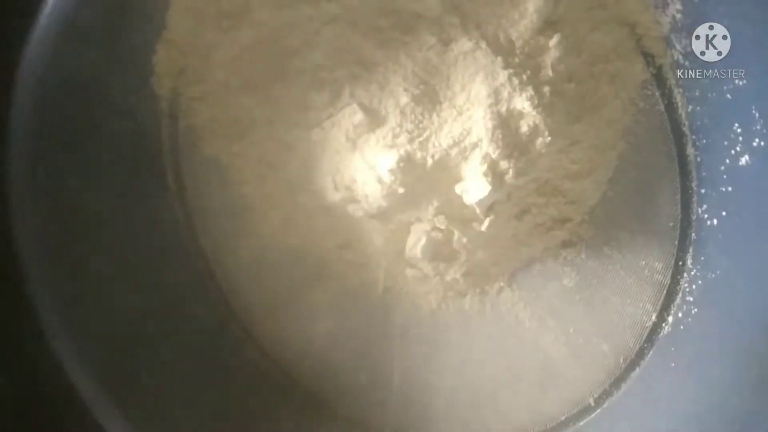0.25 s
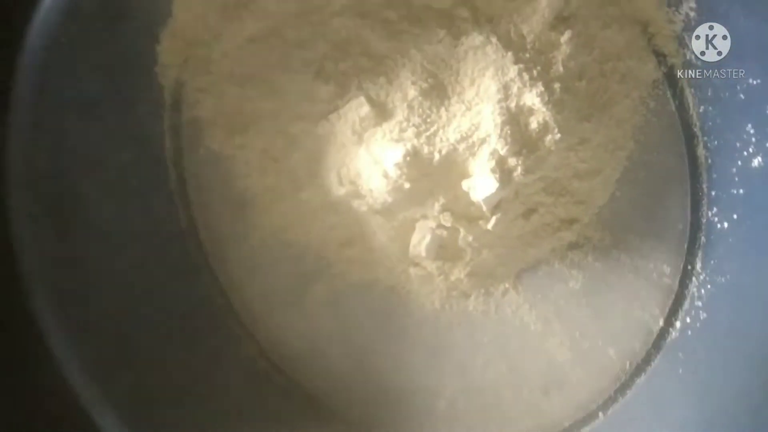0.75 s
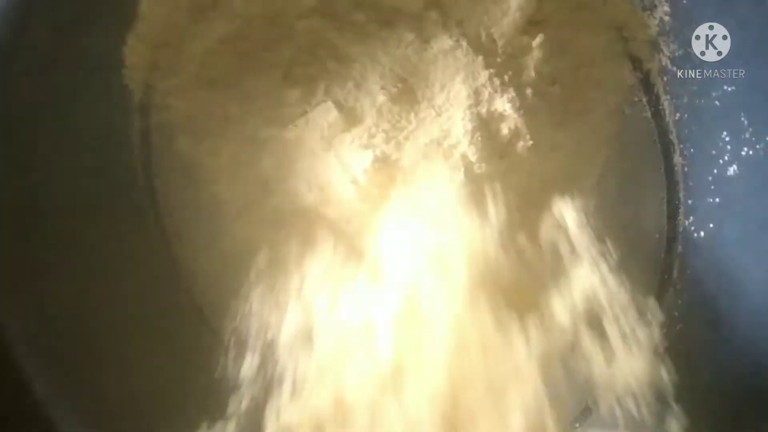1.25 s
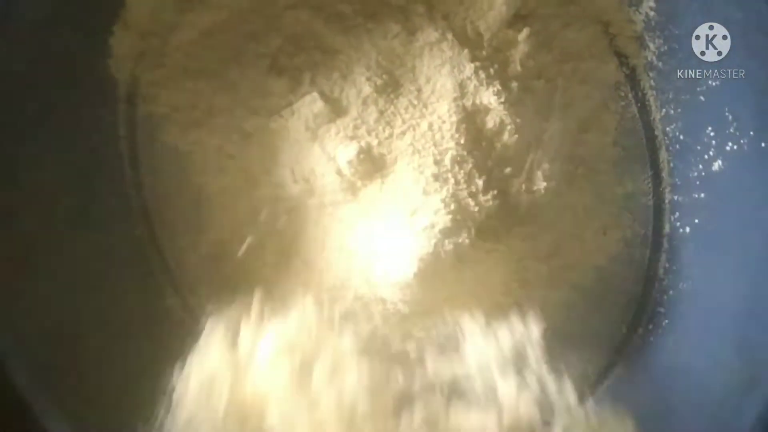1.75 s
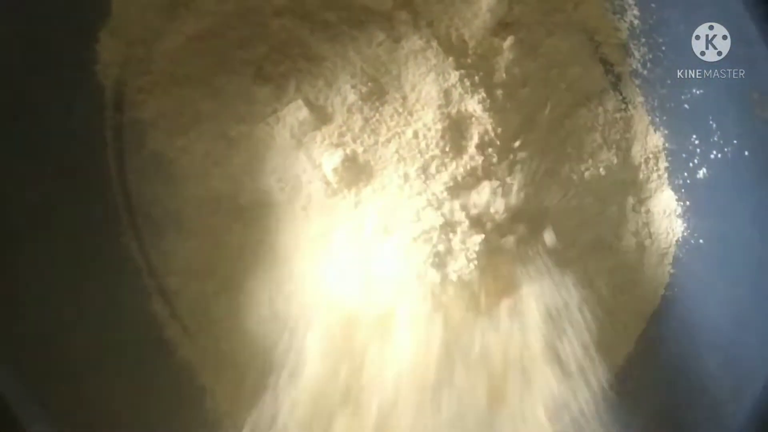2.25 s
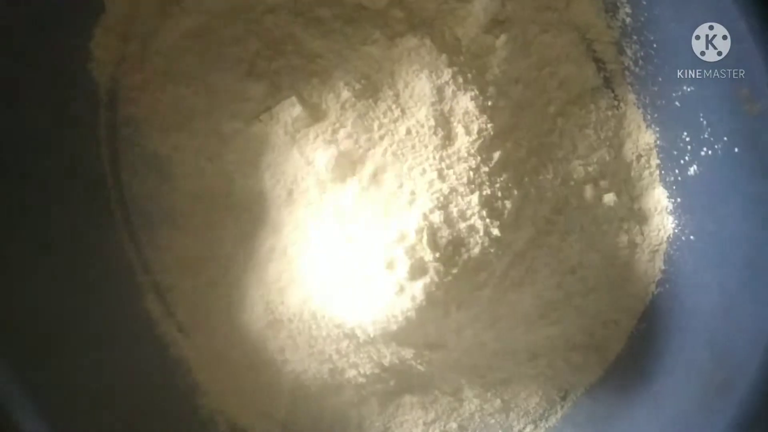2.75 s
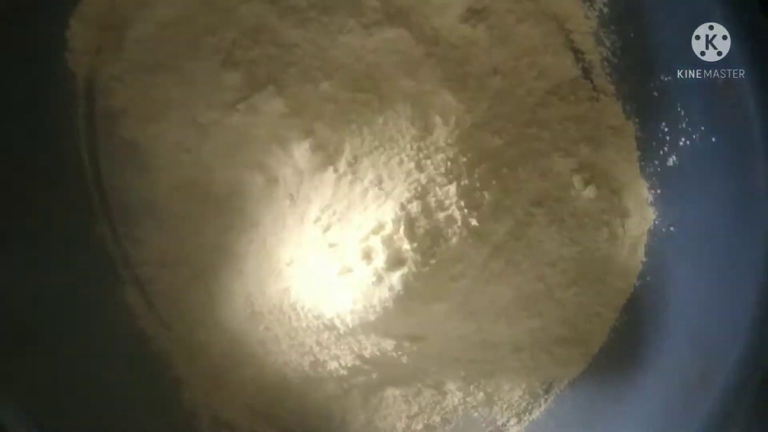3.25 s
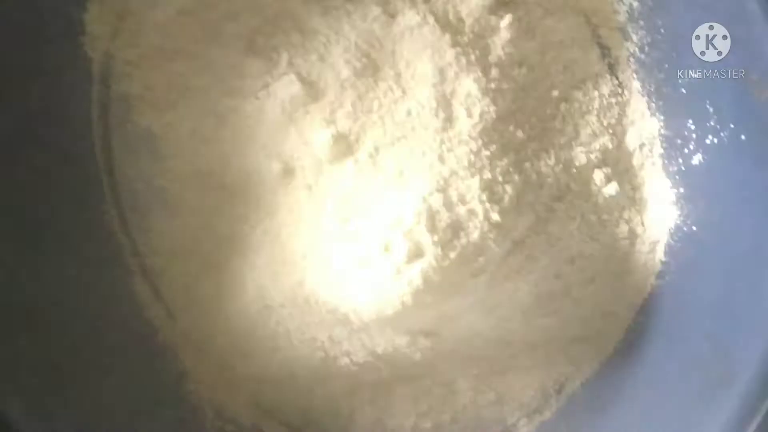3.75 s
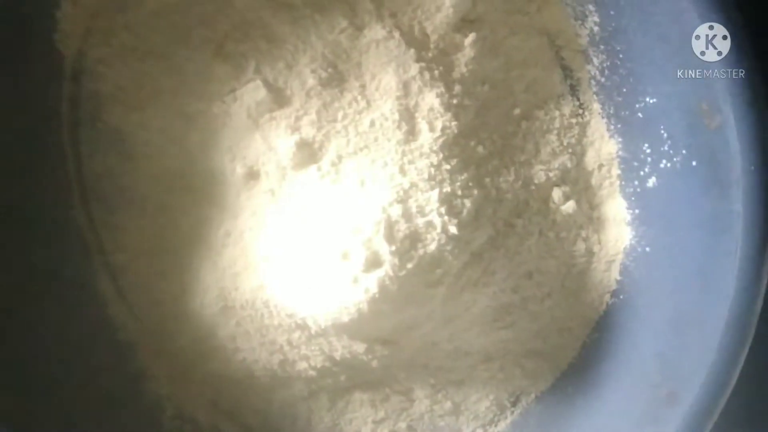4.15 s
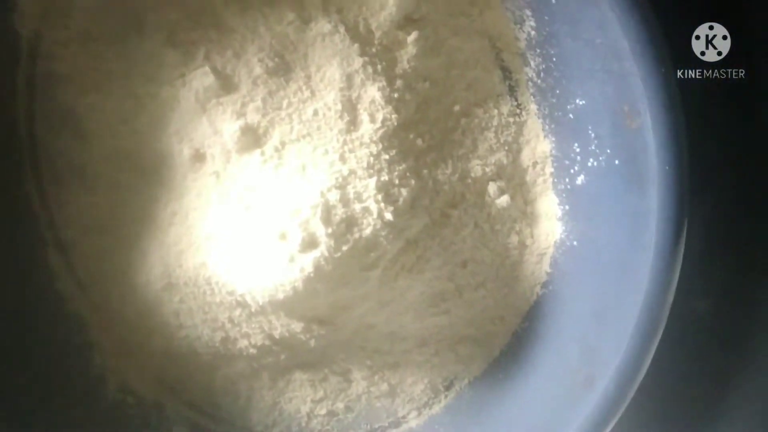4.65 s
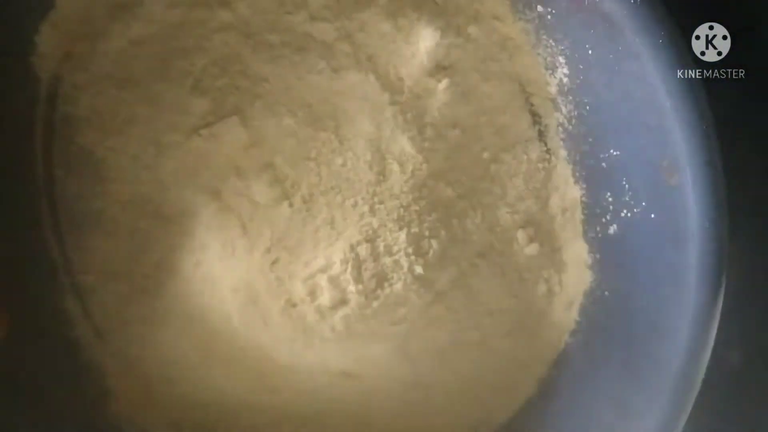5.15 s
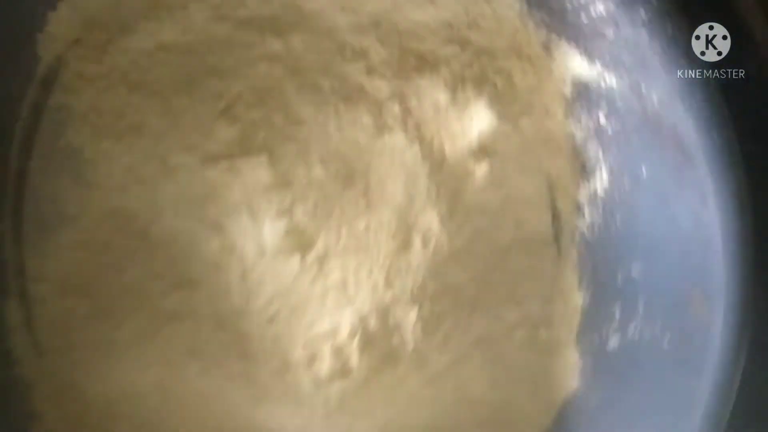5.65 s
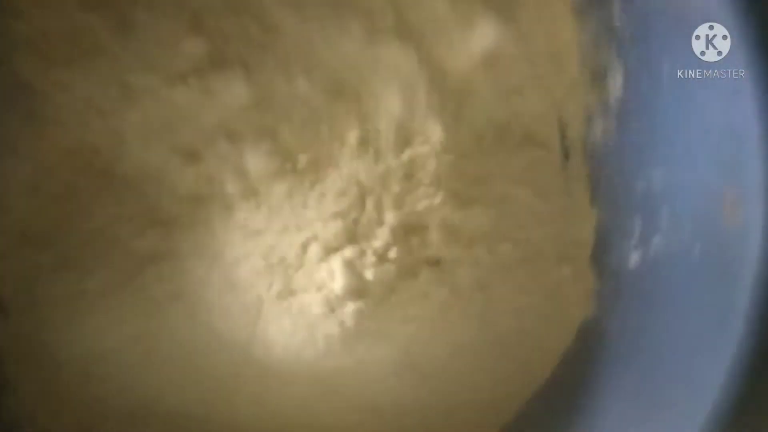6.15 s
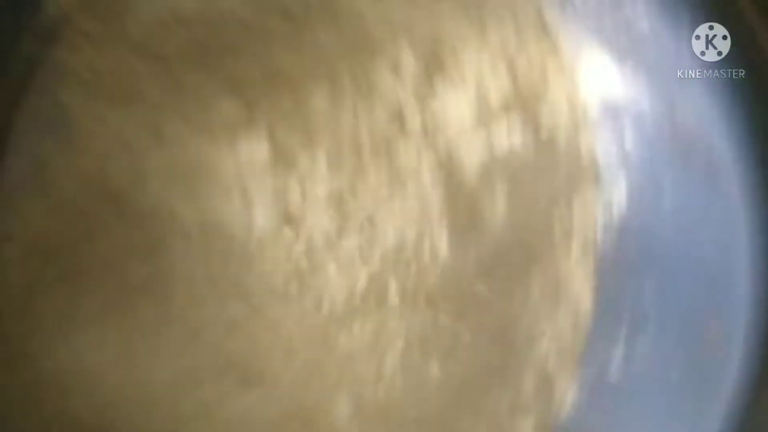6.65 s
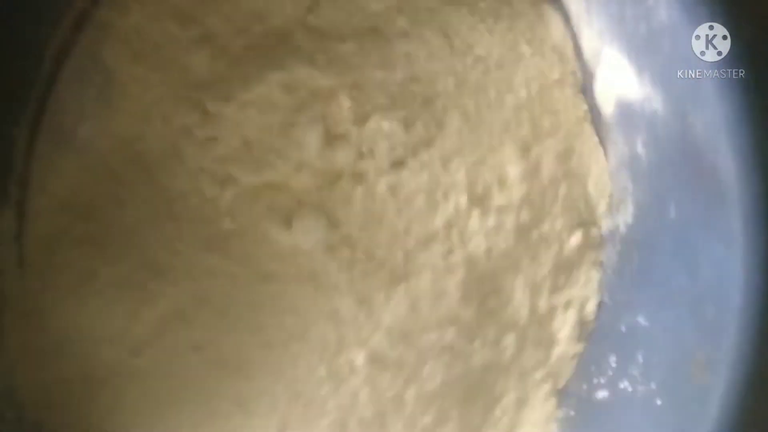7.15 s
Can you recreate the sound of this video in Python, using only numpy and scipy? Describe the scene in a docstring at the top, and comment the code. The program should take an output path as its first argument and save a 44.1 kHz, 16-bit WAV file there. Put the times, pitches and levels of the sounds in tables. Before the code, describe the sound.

Close above a steel bowl in a small hard-walled kitchen, flour hisses through a metal sieve in soft spurts over a fan-like drone. A sudden loud bang on the sieve thuds and rings, followed by brushing on the left, a thin metal squeak and a sharp bowl clang. Rubbing strokes lead into quick, rhythmic, raspy shaking.

```python
"""Flour is shaken through a metal sieve into a steel bowl: grains hiss through the mesh and patter on a heap.
Taps make the sieve thud, ring, tick and rattle, one of them hard; its strokes rasp on floury steel.
Knocked, the bowl cracks, rings and clatters; dragging metal gives a thin, swelling squeak.
Place: a small, hard-walled kitchen with a fan-like drone of coloured noise and wavering tones.
Microphone: a phone close above, two ports, brushed far left near 4.4 s; its limiter holds down the hardest blow."""
import sys
import numpy as np
from scipy import signal
from scipy.fft import rfft, irfft, next_fast_len
from scipy.io import wavfile
from scipy.ndimage import uniform_filter1d

SR = 44100
rng = np.random.default_rng(int(sys.argv[2]) if len(sys.argv) > 2 else 0)


def unload_wav(signal):
    """Save mono or channel-first audio to the path in sys.argv[1] as 16-bit WAV at rate SR, clipped to [-1, 1]."""
    wavfile.write(
        sys.argv[1],
        SR,
        np.round(np.clip(np.atleast_2d(signal).T, -1, 1) * 32767).astype(np.int16),
    )


N = 326003
T = np.arange(N) / SR  # time [s]
FREQ = np.maximum(np.arange(N // 2 + 1) * SR / N, 1)  # spectrum axis [Hz]


def undb(db):
    """Decibels to gain."""
    return 10 ** (np.asarray(db) / 20)


def unit(x):
    """Scale to rms 1."""
    return x / np.sqrt(np.mean(x ** 2))


def on_log(hz, points):
    """Read (frequency [Hz], value) points on a log-frequency axis."""
    f, value = np.transpose(points)
    return np.interp(np.log(hz), np.log(f), value)


def colour(x, points):
    """Filter a sound by a curve of (frequency [Hz], gain [dB]) points."""
    return irfft(rfft(x) * undb(on_log(FREQ, points)), N)


def butter(x, hz, kind, order=2):
    """Causal low-pass or high-pass."""
    sos = signal.butter(order, min(hz, SR / 2 - 1), kind, fs=SR, output="sos")
    return signal.sosfilt(sos, x)


def walk(rate):
    """Random wander with spread 1, heading for a new value rate times a second."""
    k = int(SR / rate)
    steps = np.repeat(rng.standard_normal(N // k + 1), k)
    return unit(uniform_filter1d(steps, k)[:N])


def diffuse(null_hz=850):
    """Spectrum of noise from all sides at two ports: alike in the bass, unrelated in the treble."""
    mid, side = rfft(rng.standard_normal((2, N)))
    alike = np.clip(0.95 * np.sinc(FREQ / null_hz), -1, 1)
    mid, side = mid * np.sqrt(1 + alike), side * np.sqrt(1 - alike)
    return np.array([mid + side, mid - side])


def panned(x, pan_db):
    """Lean a sound to the left by pan_db."""
    return x * undb(np.array([[1], [-1]]) * pan_db / 2)


def ports(x, pan_db, lead_s):
    """Place a sound: louder at the left port by pan_db and earlier there by lead_s."""
    shift = np.exp(1j * np.pi * FREQ * np.array([[lead_s], [-lead_s]]))
    return panned(irfft(rfft(x) * shift, N), pan_db)


def add(track, s, sound):
    """Mix a sound into a track at time s."""
    i = int(s * SR)
    track[..., i:i + sound.shape[-1]] += sound[..., :max(N - i, 0)]


def ring(modes, sign=1):
    """Decaying modes after one blow, peak 1; a negative sign swings neighbouring modes in opposition."""
    t = T[:SR // 3]
    y = 0
    for k, (hz, width, db) in enumerate(modes):
        strength = sign ** k * undb(db) * width
        y = y + strength * np.exp(-np.pi * width * t) * np.sin(2 * np.pi * hz * t)
    return y / np.abs(y).max()


def bounces(per_s=900):
    """Tiny contacts of loose metal, uneven in time and strength."""
    return (rng.random(N) < per_s / SR) * rng.uniform(-1.06, 1, N)


def swell(middle_s, half_s):
    """One smooth push: rises to 1 and falls again."""
    return np.exp(-np.abs((T - middle_s) / half_s) ** 2.2)  # 2 is a bell, more is flatter on top


# Kitchen reverberation: (frequency [Hz], time to fall by 60 dB [s])
ROOM_DECAY = [(150, .6), (400, .55), (1200, .5), (4000, .48), (14000, .42)]
# Standing waves between the walls: (frequency [Hz], time to fall by 60 dB [s], energy against the tail [dB])
STANDING_WAVES = [(109.5, .7, -30), (172, .45, -34), (205.5, .5, -31)]


def walls():
    """Impulse response of the hard kitchen walls: a diffuse tail and a few standing waves in the bass."""
    t, noise, tail, waves = T[:SR], diffuse(), 0, 0
    centres = np.array(ROOM_DECAY)[:, 0]
    for (hz, t60), pick in zip(ROOM_DECAY, np.eye(len(ROOM_DECAY))):
        band = on_log(FREQ, np.c_[centres, pick])
        tail = tail + irfft(noise * band, N)[:, :SR] * np.exp(-np.log(1000) * t / t60)
    for hz, t60, db in STANDING_WAVES:
        wave = np.sin(2 * np.pi * hz * t) * np.exp(-np.log(1000) * t / t60)
        waves = waves + undb(db) * unit(wave)
    onset = np.clip(t / 0.00039 - .5, 0, 1)  # the walls answer just after the direct sound
    return (unit(tail) + waves) * onset / np.sqrt(SR)


def kitchen(x, room, wet_db, pan_db=0.0, lead_s=0.0):
    """The direct sound at both ports plus its reverberation, which leans less to one side."""
    echo = signal.fftconvolve(x[None], room, axes=1)[:, :N]
    return ports(x, pan_db, lead_s) + undb(wet_db) * panned(echo, pan_db / 2)


# Spectrum of the room's rush: (frequency [Hz], relative density [dB per Hz])
RUSH_COLOUR = [(30, -29), (80, -34), (115, -22.5), (170, -4), (265, -4.5), (315, 1.5), (420, -0.5),
               (560, -4), (740, -9.5), (1000, -8), (1600, -15), (3000, -21.5), (5500, -28.5), (15000, -33)]
# Tones in the drone: (frequency [Hz], width at half amplitude [Hz], level [dB])
DRONE_TONES = [(174, 30, -68.5), (304.1, 5.5, -49), (420, 21, -55)]


def drone(around_db=-43, direct_db=-57, lead_s=-0.00038):
    """Fan-like rush from all round and straight from the right, swelling a little, with wavering tones."""
    rush = unit(colour(irfft(diffuse(), N), RUSH_COLOUR)) * undb(around_db)
    direct = butter(unit(colour(rng.standard_normal(N), RUSH_COLOUR)), 600, "high")
    rush = rush + ports(unit(direct) * undb(direct_db), 0, lead_s)
    rush = rush * undb(.4 * walk(5))
    air, tones = diffuse(), 0
    for hz, width, db in DRONE_TONES:
        resonance = 1 / (1 + ((FREQ - hz) / width * 2) ** 2)
        tones = tones + undb(db) * unit(irfft(air * resonance, N))
    return rush + tones


# Thin squeak, swelling again and again: (time [s], pitch [Hz], level [dB])
SQUEAK_PATH = [(4.565, 2740, -66), (4.605, 2830, -55), (4.635, 2780, -65), (4.675, 2770, -57),
               (4.728, 2890, -68), (4.742, 2905, -54), (4.775, 2885, -51), (4.803, 2885, -62),
               (4.828, 2892, -47), (4.853, 2896, -47), (4.88, 2915, -68), (4.915, 2948, -49.5),
               (4.952, 2945, -57), (4.975, 2945, -54), (4.994, 2945, -69), (5.012, 2950, -51.5),
               (5.037, 2942, -50), (5.072, 2925, -72), (5.097, 2928, -52), (5.122, 2925, -53),
               (5.15, 2905, -70), (5.222, 2895, -49), (5.265, 2900, -63), (5.295, 2900, -57),
               (5.325, 2890, -62)]


def squeak(room, scratch_until_s=4.72, octave_db=-20, stutter_db=2.5):
    """Metal drags on metal: an unsteady tone with a weak octave swells as it catches, at first a scratch."""
    s, hz, db = np.transpose(SQUEAK_PATH)
    waver = walk(900) * np.where(T < scratch_until_s, 0.06, 0.006)  # fraction of the pitch
    phase = 2 * np.pi * np.cumsum(np.interp(T, s, hz) * (1 + waver)) / SR
    grip = undb(np.interp(T, s, db)) * (T > s[0]) * (T < s[-1])
    tone = unit(np.sin(phase) + undb(octave_db) * np.sin(2 * phase))
    return kitchen(tone * grip * undb(stutter_db * walk(120)), room, wet_db=-15)


# Knocks of the bowl: (time [s], level over the first 10 ms [dB], contact hardness [Hz])
BOWL_KNOCKS = [(4.4779, -37, 700), (4.516, -33, 300), (4.5337, -30, 1890), (4.5401, -33.5, 350),
               (4.613, -41, 250), (5.287, -39, 350), (5.315, -23.5, 400), (5.324, -18.5, 500),
               (5.3319, -11, 3060), (5.3342, -16.5, 2000), (5.3378, -24, 4500), (5.3427, -16, 700),
               (5.372, -29, 900), (5.379, -28, 1200), (5.3886, -29.5, 2500), (5.397, -31, 700),
               (5.4334, -27, 800), (5.519, -30, 700), (5.608, -36, 1506), (7.216, -30, 520),
               (7.246, -32.5, 300), (7.3479, -34, 2190), (7.379, -34, 395)]
# Modes of the steel bowl, damped by the flour: (frequency [Hz], width [Hz], height in the spectrum [dB])
BOWL_MODES = [(205, 22, 7), (316, 36, 6), (412, 70, 6.5), (510, 170, 1), (610, 90, -1), (849, 28, -3),
              (919, 24, -1), (1238, 80, -4), (1366, 55, -5), (1506, 45, -5), (1737, 42, 1), (2450, 480, -9),
              (3360, 130, -10), (3675, 65, -7.5), (4220, 220, -17), (4580, 110, -20)]


def bowl(room, crack_db=-14, crack_s=0.0076, clatter_db=-23, clatter_s=0.03, spread_db=1.5):
    """A knock cracks, rings its own mix of modes and clatters; a soft contact reaches only the low modes."""
    out, t = np.zeros(N), T[:SR // 3]
    chatter = unit(butter(rng.standard_normal(N) * undb(4 * walk(700)), 1100, "high"))
    clatter = signal.fftconvolve(bounces(), ring(BOWL_MODES, sign=-1.045))[:N]
    clatter = unit(butter(clatter, 800, "high"))
    spots = spread_db * rng.standard_normal((len(BOWL_KNOCKS), len(BOWL_MODES)))
    for (s, db, hard_hz), spot in zip(BOWL_KNOCKS, spots):
        struck = [(hz, width, mode_db + shift) for (hz, width, mode_db), shift in zip(BOWL_MODES, spot)]
        start = int(s * SR)
        crack = np.roll(chatter, -start)[:len(t)] * np.exp(-t / crack_s)
        loose = np.roll(clatter, -start)[:len(t)] * np.exp(-t / clatter_s)
        blow = ring(struck, sign=-1.012) + undb(crack_db) * crack + undb(clatter_db) * loose
        blow = butter(butter(blow, hard_hz, "low", order=1), 4 * hard_hz, "low", order=1)
        add(out, s, undb(db) * blow / np.std(blow[:SR // 100]))
    return kitchen(butter(out, 165, "high", order=3), room, wet_db=-13, pan_db=0.5, lead_s=-0.0002)


# Taps on the sieve: (time [s], thud [dB], frame ring [dB], mesh tick [dB], mesh rattle [dB])
SIEVE_TAPS = [(1.196, -45, -60, -41, -54), (1.212, -29.5, -58, -42, -54), (1.222, -49, -58, -38, -63),
              (1.405, -57.5, -60, -36, -50.5), (1.410, -57, -60, -39, -66), (1.427, -57, -60, -39, -72),
              (2.012, -52, -55, -39.5, -58), (4.0401, -11, -0.5, -16, -60), (4.0424, 3.5, -4, -6, -16.5),
              (4.0466, 7.5, -19, -27, -60), (4.07, -1.5, -22, -28, -55), (4.128, -6.5, -30, -25, -59),
              (4.215, -15, -31, -40, -55), (4.447, -26, -66, -49, -48), (4.479, -21, -55, -60, -70),
              (4.498, -20, -55, -60, -68), (4.517, -15, -55, -60, -62), (4.5465, -14, -50, -55, -70),
              (4.566, -22, -55, -60, -70), (4.611, -24, -55, -60, -53), (4.688, -53, -58, -35, -73),
              (5.3332, -37, -52, -26.5, -40.5), (5.5166, -19.5, -25.5, -26, -44),
              (6.388, -60, -52, -46, -70)]
# Dull body of sieve and flour: (frequency [Hz], width [Hz], height in the spectrum [dB])
THUD_MODES = [(176, 40, -3), (248, 60, -1), (308, 70, 1), (372, 70, -4)]
# Sieve frame: (frequency [Hz], width [Hz], height in the spectrum [dB])
FRAME_MODES = [(684, 18, 18), (955, 80, 13), (1122, 24, 15), (1177, 22, 28.5), (1251, 32, 22),
               (1950, 900, 3)]
# Thin rings of the taut wires: (frequency [Hz], width [Hz], height in the spectrum [dB])
WIRE_MODES = [(2971, 6, -4), (4101, 6, -4), (4420, 6, -4), (5544, 6, -4), (6191, 6, -7), (6934, 6, -8),
              (8330, 8, -2), (8448, 7, 0), (8582, 9, -3), (8658, 8, -3), (8909, 7, -2), (10067, 7, -6),
              (10923, 7, -6)]
# Rattle of the wire mesh: (frequency [Hz], relative level [dB])
MESH_COLOUR = [(100, -50), (500, -9), (1000, 11.5), (2200, -8.5), (3000, 1.5), (3800, -5), (4200, -2),
               (4900, -1), (5500, 0.5), (6400, -6), (7200, 3), (7900, -0.5), (8450, 9), (9200, -4),
               (11200, 0), (15000, -6.5)]


def sieve(room, tick_s=0.0023, rattle_s=0.064, wire_db=-4, loose_db=-1.5, rumble_db=-4):
    """A tap thuds in the loaded sieve; frame and wires ring, loose metal bounces, mesh ticks and rattles."""
    body, rim, tick, rattle = np.zeros((4, N))
    thud, frame, zing = ring(THUD_MODES), ring(FRAME_MODES), ring(WIRE_MODES)
    for s, thud_db, frame_db, tick_db, rattle_db in SIEVE_TAPS:
        add(body, s, undb(thud_db) * thud)
        add(rim, s, undb(frame_db) * frame + undb(rattle_db + wire_db) * zing)
        add(tick, s, undb(tick_db) * np.exp(-T[:SR] / tick_s))
        add(rattle, s, undb(rattle_db) * np.exp(-T[:SR] / rattle_s))
    # loose contacts keep striking frame and body while the rattle dies away
    rim = rim + undb(loose_db) * signal.fftconvolve(rattle * bounces(), frame)[:N]
    body = body + undb(rumble_db) * signal.fftconvolve(rattle * bounces(), thud)[:N]
    body = butter(body, 185, "high", order=3)
    tick = tick * unit(butter(rng.standard_normal(N), 900, "high"))
    grains = rng.standard_normal((2, N)) * undb(2 * rng.standard_normal(N))
    jolted = rattle * unit(colour(grains, MESH_COLOUR)) * undb(1.2 * walk(200))
    return (kitchen(body, room, wet_db=-7, pan_db=-2, lead_s=0.00049)
            + kitchen(rim, room, wet_db=-7.5, pan_db=8, lead_s=0.00041)
            + kitchen(tick, room, wet_db=-15, pan_db=7, lead_s=.0003)
            + panned(jolted, pan_db=3.0))


# Strokes of the sieve rubbing in the bowl: (time [s], level [dB], rise [s], fall to 1/e [s])
RUB_STROKES = [(5.153, -41, 0.0074, 0.15), (5.830, -37, 0.018, 0.043), (5.882, -49, 0.021, 0.017),
               (6.145, -44, 0.014, 0.038), (6.37, -48.5, 0.013, 0.057)]


def strokes():
    """Force of the rubbing strokes: each rises quickly and dies away."""
    force = 0
    for s, db, rise, fall in RUB_STROKES:
        attack = np.clip((T - s) / rise, 0, 1)
        force = force + undb(db) * attack * np.exp(-np.maximum(T - s - rise, 0) / fall)
    return force


# Quick shakes of the sieve, about nine a second: (middle time [s], flour level [dB], rubbing level [dB])
SIEVE_SHAKES = [(6.275, -57, -66), (6.425, -64, -70), (6.548, -52.5, -52.5), (6.657, -52, -65),
                (6.772, -49, -48.5), (6.883, -51.5, -66), (6.995, -44.5, -45.5), (7.089, -50.5, -61),
                (7.215, -53.5, -51.5), (7.322, -52.5, -65)]


def shakes(column, half_s=0.032):
    """Pushes of the shaking hand, at the levels in one column of the table."""
    return sum(undb(row[column]) * swell(row[0], half_s) for row in SIEVE_SHAKES)


# Rasp of the rubbing: (frequency [Hz], relative level [dB])
RASP_COLOUR = [(400, -21), (1000, -5), (1450, 1), (1800, -6), (2300, -3.5), (3200, -4.5), (4200, -16.5),
               (5100, -9.5), (6500, -18), (15000, -31)]


def rubs(rough_db=2.5):
    """With each stroke and shake the metal catches and slips on the floury steel."""
    force = strokes() + shakes(column=2)
    rasp = unit(colour(irfft(diffuse(), N), RASP_COLOUR))
    return rasp * force * undb(rough_db * walk(250))


def heap(middle_s=1.4, half_s=0.51, level_db=-48, lumps_db=3.5):
    """The main fall of flour lands on the heap with a soft, lumpy, dull patter."""
    patter = butter(irfft(diffuse(), N), 190, "high", order=3)
    patter = butter(patter, 520, "low")
    return unit(patter * undb(lumps_db * walk(25.16))) * undb(level_db) * swell(middle_s, half_s)


# Centres of the bands that waver separately: frequency [Hz]
FLICKER_CENTRES = [3000, 5500, 8000, 11000, 14500]


def flicker(x, depth_db=1.7, per_s=45):
    """Each band of a hiss wavers on its own, so that its colour keeps shifting."""
    size = next_fast_len(N, True)
    spectrum = rfft(x, size)
    hz = np.maximum(np.arange(size // 2 + 1) * SR / size, 1)
    out = 0
    for pick in np.eye(len(FLICKER_CENTRES)):
        share = on_log(hz, np.c_[FLICKER_CENTRES, pick])
        band = irfft(spectrum * share, size)[:, :N]
        out = out + band * undb(depth_db * walk(per_s))
    return out


# Spurts of flour through the mesh; the far-left ones near 4.4 s are brushing hiss, perhaps a finger on
# the phone: (middle time [s], level [dB], half length [s], left minus right [dB])
HISS_SPURTS = [(0.138, -49, 0.036, 4), (0.882, -54.5, 0.036, 4), (1.099, -44.5, 0.09, 2),
               (1.219, -44, 0.015, 2), (1.27, -48.5, 0.1, 2), (1.486, -46, 0.075, 3), (1.612, -56, .016, 3),
               (1.677, -45.5, 0.047, 3), (1.847, -45, 0.051, 2), (2.023, -51, 0.08, 6),
               (2.162, -46, 0.029, 2), (2.356, -51, .011, 4), (2.954, -50, 0.12, 2.5),
               (3.198, -45, .11, 4.5), (3.68, -62.5, 0.2, 15), (4.38, -52, 0.071, 13),
               (4.444, -45, 0.034, 11.5), (4.521, -48, 0.065, 13.5), (5.2, -57, 0.24, 5),
               (5.58, -62, 0.1, 8)]
# Hiss of the flour, shared by the brushing: (frequency [Hz], relative level [dB])
HISS_COLOUR = [(400, -13), (1500, -4), (3000, -1), (5500, 0.5), (7000, -0.5), (9000, 2), (12000, 3),
               (15000, 1.5)]


def flour_and_brushing(shed_db=-7.5, trickle_db=-68, crumbs_per_s=400, crumb_db=15):
    """Grains and crumbs patter through the mesh in spurts, shakes and a trickle; a like hiss is brushing."""
    spurts = sum(panned(undb(db) * swell(s, half_s), pan_db) for s, db, half_s, pan_db in HISS_SPURTS)
    shaken = shakes(column=1) + undb(shed_db) * strokes()  # each stroke sheds flour too
    flow = np.hypot(spurts + panned(shaken, 7), undb(trickle_db))
    clumps_db = 2.5 * rng.standard_normal(N) + 1.1 * walk(99)  # grain by grain, and slower
    grains = rng.standard_normal((2, N)) * undb(clumps_db)
    crumbs = (rng.random(N) < crumbs_per_s / SR) * rng.standard_normal((2, N)) * undb(crumb_db)
    return unit(flicker(colour(grains + crumbs, HISS_COLOUR))) * flow


def scene():
    """Everything at the two ports."""
    room = walls()
    return drone() + squeak(room) + bowl(room) + sieve(room) + rubs() + heap() + flour_and_brushing()


def record(dry, ceiling_db=-11.5, release_db_per_s=95, round_at=.8, top_hz=15450):
    """The limiter ducks at once and recovers steadily; peaks are rounded, deep bass and top are cut."""
    loudness = uniform_filter1d(np.abs(dry), size=88, axis=1).max(axis=0)  # 2 ms mean, louder port
    over = np.maximum(20 * np.log10(np.abs(loudness) + 1e-9) - ceiling_db, 0)
    # a running maximum on a rising ramp: the gain comes back at a fixed rate
    ramp = release_db_per_s * T
    duck_db = np.maximum.accumulate(over + ramp) - ramp
    held = round_at * np.tanh(dry * undb(-duck_db) / round_at)
    held = butter(held, 75, "high")
    return signal.sosfilt(signal.ellip(10, .2, 70, top_hz, fs=SR, output="sos"), held)


dry = scene()
out = record(dry)
unload_wav(out)
```